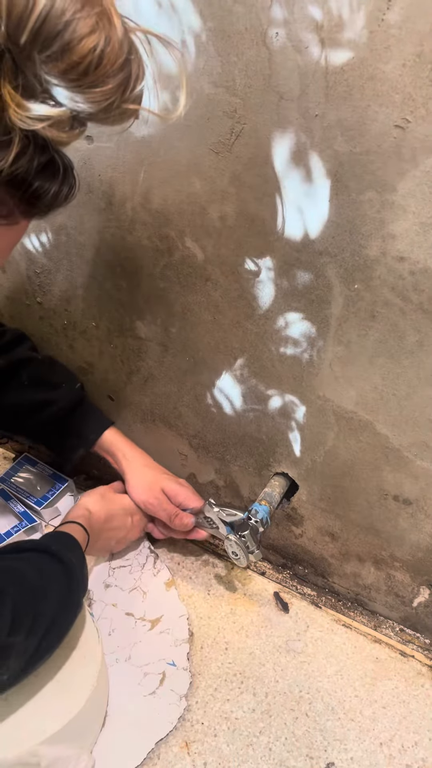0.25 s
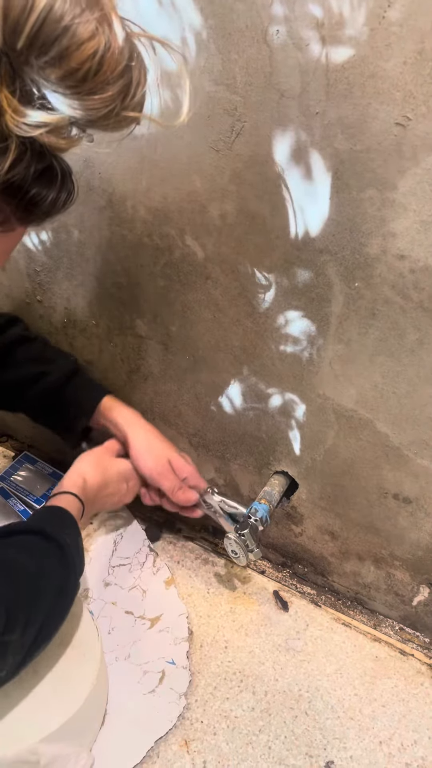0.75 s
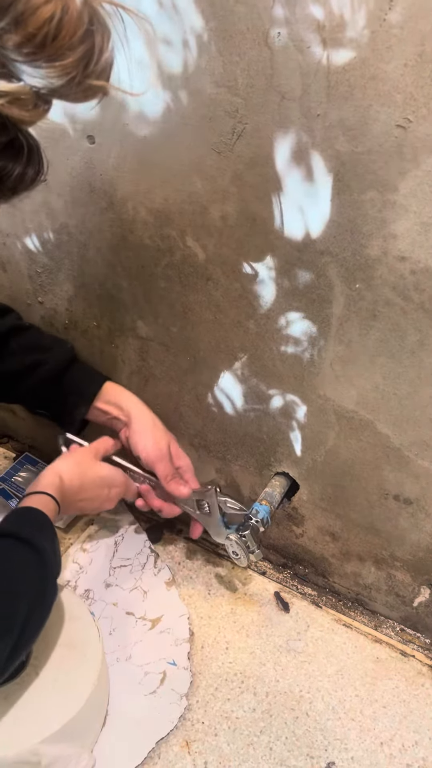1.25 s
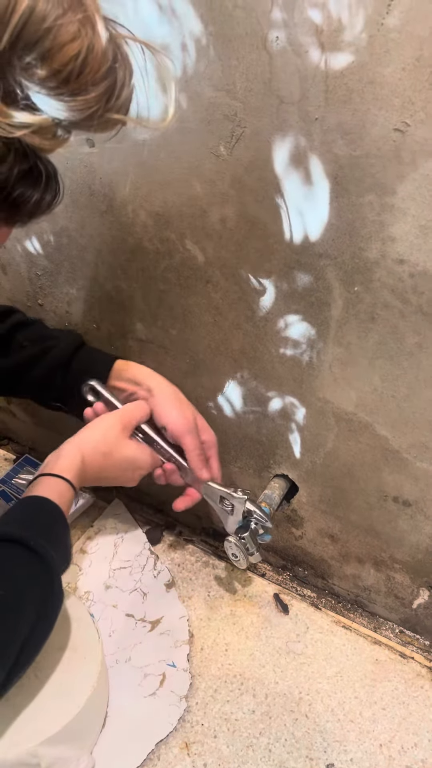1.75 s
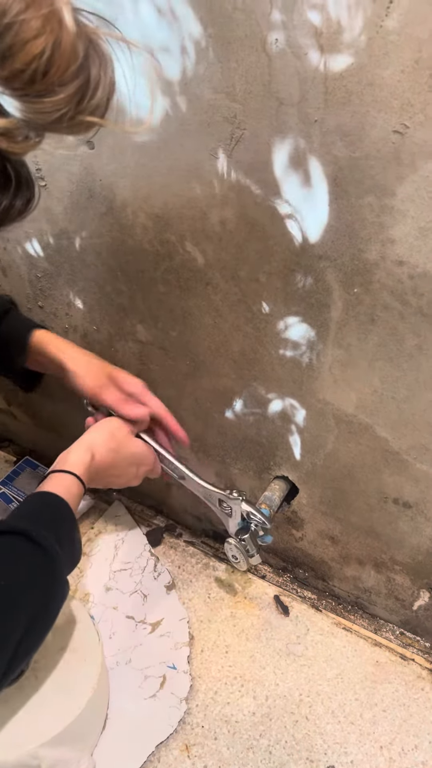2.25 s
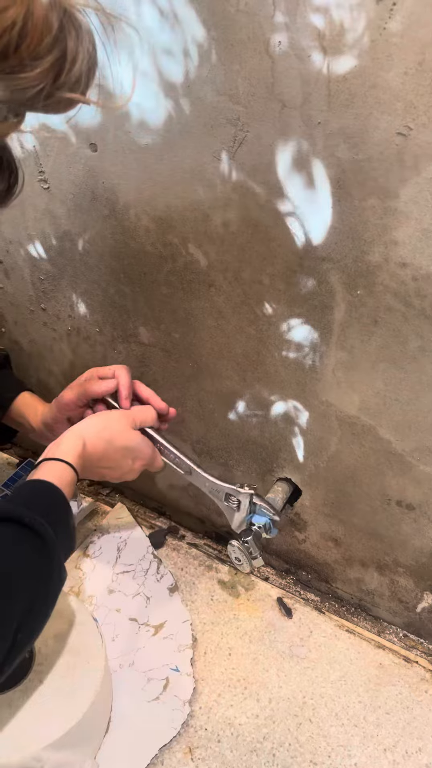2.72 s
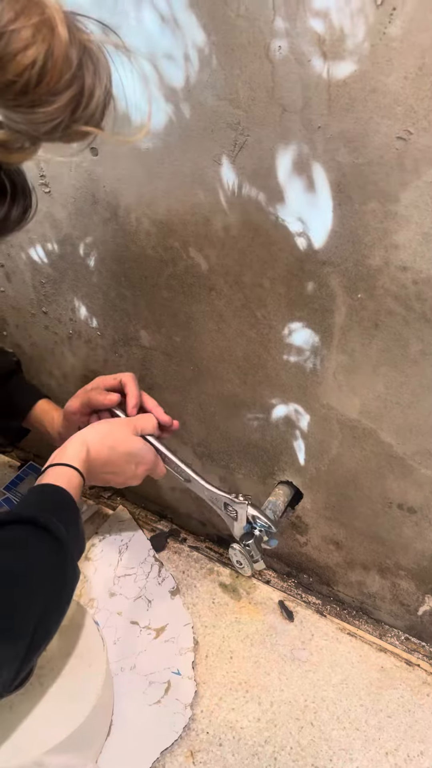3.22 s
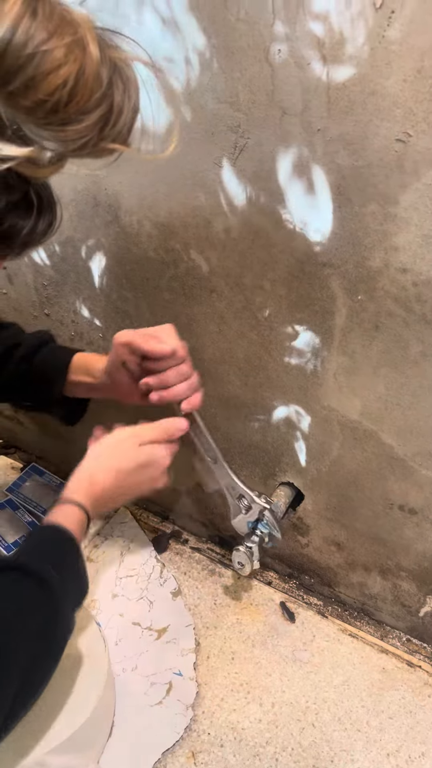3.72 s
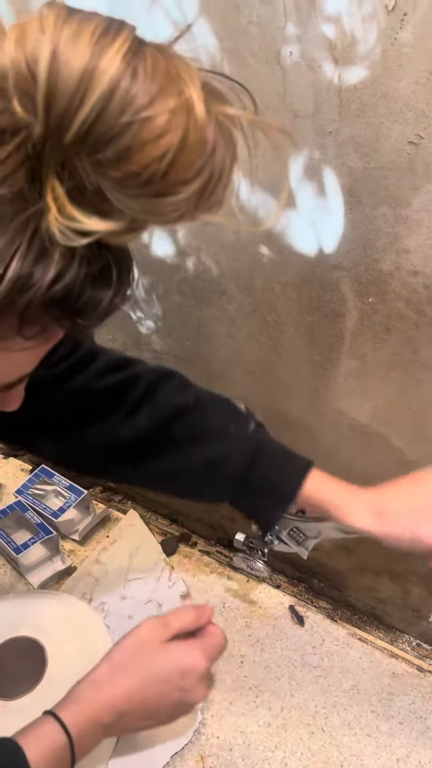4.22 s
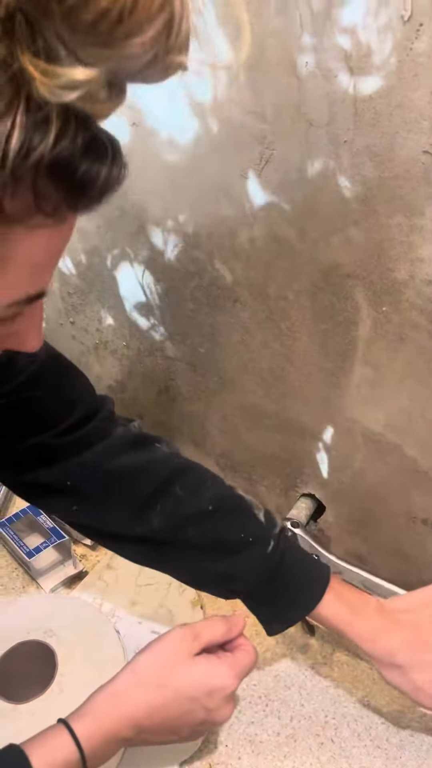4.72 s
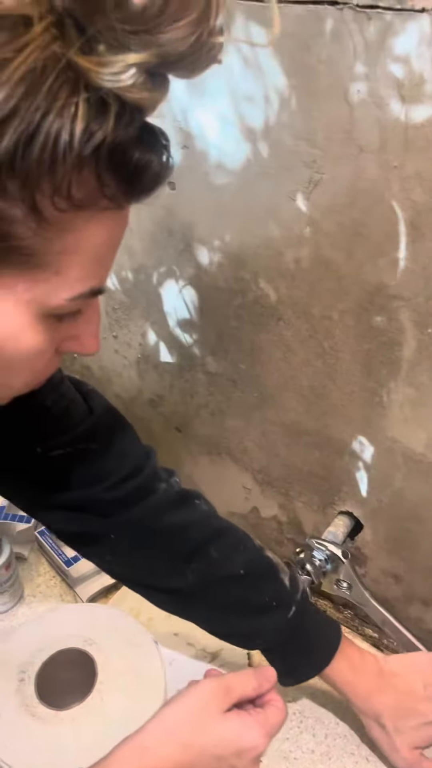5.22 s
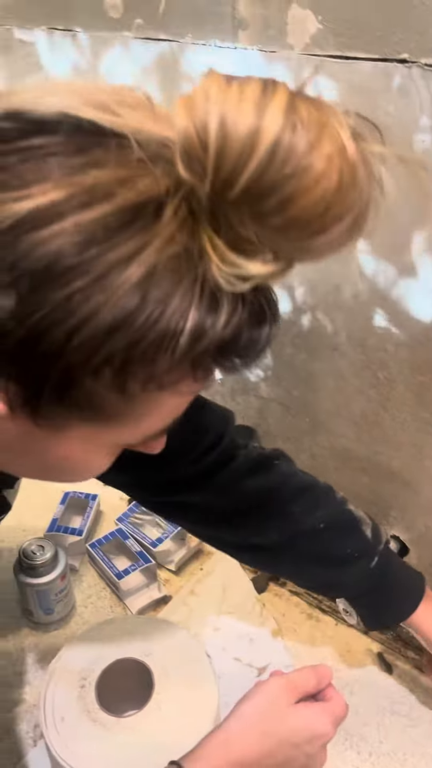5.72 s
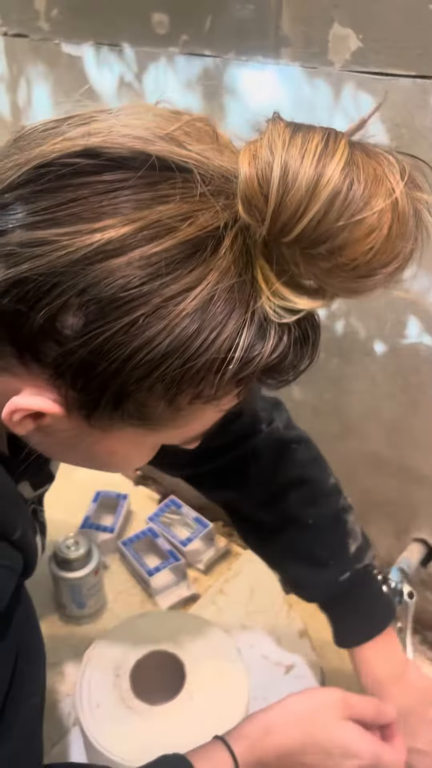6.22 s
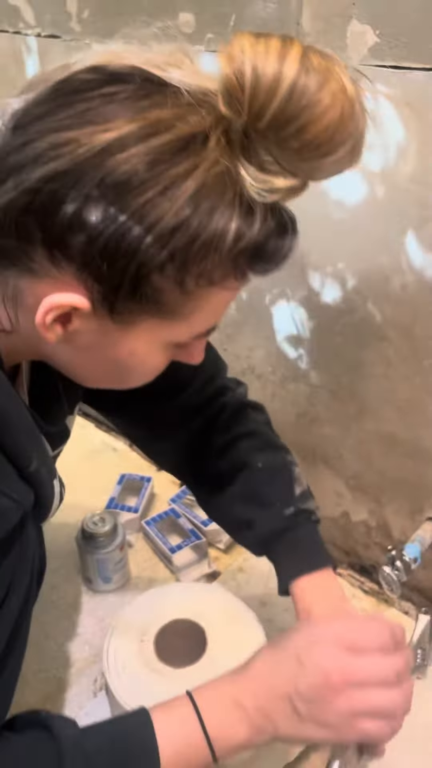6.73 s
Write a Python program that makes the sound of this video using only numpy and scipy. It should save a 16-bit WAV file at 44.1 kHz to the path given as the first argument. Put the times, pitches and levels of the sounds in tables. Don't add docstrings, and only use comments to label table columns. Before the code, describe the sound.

Close stereo sound of handiwork on a wall pipe: early knock and faint squeak, jaws clicking and grinding, low booms as the hand leans on the tool. The loudest ringing steel clinks come around two and a half seconds. After a sparse stretch of faint ticks comes a heavy knock, then a sharp multi-bounce metal clatter. A fan drones underneath, with short bright room echoes.

```python
import sys
import numpy as np
from scipy import signal
from scipy.fft import rfft, irfft
from scipy.io import wavfile

SR = 44100
rng = np.random.default_rng(int(sys.argv[2]) if len(sys.argv) > 2 else 0)


def convert_level_to_amplitude(level_db):
    exponent = np.asarray(level_db, float) / 20
    return 10 ** exponent


def wrap_up_sound(samples):
    columns = np.atleast_2d(samples).T
    tamed = np.clip(columns, -1, 1)
    steps = np.round(tamed * 32767).astype(np.int16)
    wavfile.write(sys.argv[1], SR, steps)


N = 306936
T = np.arange(N) / SR
HZ = np.fft.rfftfreq(N, 1 / SR)

# [f/Hz, level per Hz/dB]
FAN_SPECTRUM = [(15, -60), (25, -24.5), (65, 13), (115, -8.5), (174, -17.5), (249, -4.5), (429, -28),
                (488, -10.5), (569, -21), (1300, -29.5), (1480, -37.5), (1730, -29), (12000, -54.5),
                (15600, -99), (22000, -120)]
# [f/Hz, width/Hz, lift/dB]
DUCT_PEAKS = [(115, 20, -0.5), (243.5, 130, 12.5), (442, 200, 13.5), (1368, 160, 19.5), (1746, 240, 8)]

# [t of full speed/s, hold/s, bright rub level/dB, dull grind above it/dB]
SLIDES = [(0, 0.0092, -79, 3.5), (.19, 0.0039, -70, -1.5), (.81, 0.051, -75, 4.5), (1.2, 0.17, -82, 5),
          (1.75, 0.15, -77, 4.5), (2.02, 0.076, -77, -0.5), (2.15, 0.14, -77, -2), (2.56, 0.14, -65.5, 4.5),
          (2.8, 0.064, -85, 3.5), (3.08, 0.039, -91, -12), (3.27, 0.068, -85, -15.5),
          (3.54, 0.033, -85, -11), (3.63, 0.0093, -70, -10.5), (3.78, 0.16, -77, 1), (3.98, 0.23, -81, 0),
          (4.47, 0.006, -70, -7), (4.93, 0.016, -84, -17.5), (5.38, 0.014, -82, -17),
          (5.92, 0.013, -77.5, -1), (6.18, 0.037, -70.5, -1), (6.36, 0.41, -81, 5),
          (6.85, 0.027, -82.5, -20.5)]
SCRAPES = [
    (1.625, 0.017, -73, 8),
    (1.655, 0.0093, -60, 1),
    (2.33, .04, -64, -5),
    (2.385, 0.081, -55, 2.5),
]
# [f/Hz, level per Hz/dB]
RUB_SPECTRUM = [(2000, -23.5), (3000, -8), (4500, 0.5), (6500, 5), (8500, 0), (10500, -21.5), (13000, -37)]
# [f/Hz, level per Hz/dB]
GRIND_SPECTRUM = [(400, 0), (800, -3), (1500, -6), (3000, -4.5), (4500, -11), (7000, -36)]

# [t of full strain/s, hold/s, rumble level/dB, upper modes above it/dB]
PUSHES = [(.66, .01, -46.5, 0), (.91, 0.039, -38.5, -1.5), (1.31, 0.017, -27, -8), (1.76, 0.038, -24, -1.5),
          (1.88, 0.019, -30.5, -21), (2.34, 0.03, -28.5, -19), (2.47, 0.013, -22, 3),
          (2.6, 0.075, -25.5, 2), (2.72, 0.018, -25.5, -11.5), (2.91, 0.003, -30.5, -12),
          (3.1, 0.067, -32.5, -14.5), (3.22, 0.021, -36, -26.5), (3.43, 0.069, -37.5, -20),
          (3.95, 0.085, -41.5, -21.5), (4.12, 0.028, -50.5, -15.5), (5.27, 0.021, -38.5, -10.5),
          (6.03, 0.029, -36, -19), (6.14, 0.12, -27.5, -5), (6.62, 0.022, -42, 2.5)]
JERKS = [
    (.44, 0.24, -46.5, 2),
    (1.1, 0.0047, -35.5, -3),
    (1.2, 0.0073, -45, 0),
    (1.64, 0.072, -29, -1.5),
    (3.86, 0.015, -37.5, -13.5),
    (5.12, 0.067, -21.5, -5),
    (5.93, 0.042, -26.5, -12),
    (6.39, 0.07, -32.5, 6),
]
# [t/s, peak level/dB]
THUDS = [(0.491, -26), (1.262, -24.5), (1.734, -14.5), (1.757, -10), (2.412, -16.5), (2.597, -17),
         (3.112, -25.5), (3.852, -45), (5.106, -10.5), (5.921, -32), (6.38, -19.5)]
# [f/Hz, level/dB, t60/s]
WALL_MODES = [(50.15, -19, 0.34), (76.6, -1.5, 0.48), (120.64, -0.5, 0.31), (141.15, -4.5, 0.54),
              (171.3, -12, 0.27), (201.46, -2.5, 0.19), (238, -2.5, 0.3), (268, -6, 0.053),
              (304, -7.5, 0.23), (400, -12, 0.035), (477, -11.5, 0.21), (533.5, -20, 0.13),
              (673, -27.5, 0.28)]

# [t/s, peak level 5-9 kHz/dB, then relative to it: 0.4-2 kHz/dB, 2-5 kHz/dB, 9-12 kHz/dB]
KNOCKS = [(0.45, -19, 1, -3, -35), (0.4915, -27.5, -10, -17, -34), (1.7203, -40.5, -7, -7, -38),
          (1.6232, -50, 2, -6, -30), (1.64, -48, -6, -5, -31), (2.3143, -51, -4, -13, -33),
          (2.4441, -23.5, -1, -5, -30), (2.617, -32, -18.5, -17, -22), (2.632, -25, -10, -10, -20),
          (0.4851, -35, -5, -4, -33), (0.5055, -45.5, 3, 11, -35), (6.661, -64, -6, 2, -30),
          (2.3796, -30.5, -7, -16, -28), (2.5143, -25.5, -16, -19, -35.5), (2.5954, -23, 4.5, 6.5, -22.5),
          (5.1029, -21.5, -5, -14.5, -40.5), (6.4514, -30, -11, -14, -48), (6.4806, -28, 1, -1, -43),
          (6.5354, -37.5, 0, 8, -26.5), (6.5834, -35, -10, -6, -27), (6.6824, -47, -4, -1, -58)]
SNAPS = [
    (0.93, -36, -17, -5, -32),
    (3.1285, -47.5, -10, -12, -4),
    (3.3428, -41, -24, 5, -25),
    (6.8475, -42, -16, -4, -25),
    (.45, -23, -1.5, 4.5, -22),
    (1.7288, -19, 1, -1, -23),
    (5.1012, -26.5, 4, -2, -29),
    (2.4172, -19.5, -7.5, -9, -9.5),
    (6.4812, -30, 2.5, 8, -25),
]
# [t/s, peak level 5-9 kHz/dB, dullness (lift of 0.4-2 kHz)/dB]
TICKS = [(0.4816, -33, 2), (0.9073, -53, 4.5), (1.095, -52, 1), (1.651, -45, 6.5), (1.9086, -51, -2),
         (2.0038, -46.5, -18), (2.3306, -40.5, -10.5), (3.0594, -59, -10), (3.109, -58.5, -9),
         (3.25, -51.5, -11), (3.286, -47, -21), (3.3901, -51, -1), (4.9202, -71.5, -11), (5.368, -45, -26),
         (6.0162, -52.5, 0.5), (6.156, -52, -2.5), (6.1786, -43.5, 4.5), (6.2347, -44, -16),
         (6.82, -50.5, -14)]
# [t/s, peak level/dB, f/Hz]
PINGS = [(0.453, -28, 1110), (1.174, -51, 3100), (1.549, -56.5, 3640), (2.418, -9, 7510),
         (2.515, -22.5, 7280), (2.555, -19, 7500), (2.574, -32.5, 1910), (2.603, -5.5, 7115),
         (3.285, -47, 7070), (5.101, -26.5, 1710), (5.104, -12, 400), (6.381, -9.5, 4290),
         (6.484, -20.5, 2930), (6.585, -24.5, 6600), (6.611, -35, 1543), (6.681, -46, 7580),
         (6.819, -46.5, 7480), (6.82, -38.5, 4950), (6.847, -49.5, 2630)]
# [t/s, f/Hz, t60/s]
NOTES = [(0.4505, 930, .025), (0.451, 4150, .012), (0.451, 2900, .012), (1.035, 7800, .01),
         (1.037, 5400, .06), (1.645, 490, .2), (1.651, 12700, .06), (1.68, 490, .15), (1.73, 1500, .02),
         (1.765, 490, .15), (1.775, 690, .1), (2.42, 974, .12), (2.422, 1308, .12), (2.431, 7000, .03),
         (2.573, 6680, .04), (2.573, 10500, .05), (2.574, 8200, .03), (2.604, 10400, .04),
         (5.1015, 2550, .01), (5.1025, 2050, .01), (5.1045, 320, .1), (6.182, 1200, .04),
         (6.182, 3400, .06), (6.198, 3050, .06), (6.203, 1180, .04), (6.224, 1000, .03),
         (6.382, 13400, .08), (6.385, 480, .2), (6.392, 1787, .066), (6.392, 3914, .08), (6.481, 6630, .12),
         (6.482, 1500, .03), (6.578, 6590, .1)]
NOTE_LEVELS = [-28, -21, -30, -39.5, -52, -38, -46, -30.5, -46, -21.5, -25, -37, -36.5, -30, -28.5, -28.5,
               -29.5, -24.5, -28, -21.5, -20.5, -41, -57.5, -55.5, -44, -43.5, -37, -33.5, -26.5, -31.5,
               -28.5, -30, -32.5]
# [t/s, f/Hz]
LUMPS = [(.49, 80), (1.29, 84), (1.752, 82), (1.757, 136), (2.31, 240), (2.6, 479), (3.86, 68),
         (6.385, 378), (6.385, 135), (6.41, 497), (.4515, 790), (5.103, 520), (5.125, 215), (6.385, 1110)]
# [peak level/dB, t60/s]
LUMP_RINGS = [(-30.5, 0.21), (-28, 0.23), (-18.5, 0.34), (-32, 0.18), (-35.5, .1), (-34, .2), (-33, 0.32),
              (-30, 0.27), (-31, 0.24), (-42, 0.19), (-24.5, 0.035), (-31, 0.044), (-36, .2), (-33, 0.23)]
BAND_TOPS_HZ = [2000, 5000, 9000]
# [t/s, length/s, level/dB, f/Hz]
SQUEAKS = [
    (0.768, 0.12, -71, 5270),
    (0.828, 0.043, -67, 3160),
]

JAW_TICK = [
    (1.256, -26, -16.5, -6.5, -13.5),
]
# [f/Hz, level/dB, t60/s]
JAW_MODES = [(6650, -12, 0.09), (10440, 6, 0.084), (9900, -6, 0.06)]
VALVE_KNOCK = [
    (1.729, -25, -4, -4, -22),
    (1.731, -23, -4, -3, -24),
    (1.745, -32, -8, -8, -24),
]
# [f/Hz, level/dB, t60/s]
VALVE_MODES = [(3367, -12, 0.28), (3428, -4, .33), (5600, -8, .2), (7500, -11, 0.1), (8140, -12, .1),
               (12800, 0, .05), (13300, 4, .05)]
CONTACTS = [
    (2.4045, -25.5, -9.5, -6.5, -29.5),
    (2.4171, -19.5, -8.5, -3, -14),
    (2.4311, -26.5, -7.5, -14.5, -43),
    (2.555, -20, -35.5, -18, -24.5),
    (2.572, -25, -16, -5.5, -19.5),
    (2.5998, -8.5, -31, -22.5, -14),
    (2.6044, -20, -19.5, -19.5, -23),
]
GRIPPED_HZ = [974, 3305, 3461, 4899, 5120, 6137, 6614, 6747, 7083, 7277, 7383, 7446, 7865, 8173, 9895,
              10340, 10500, 11990, 13110, 13950]
# [level/dB, t60/s]
GRIPPED_RINGS = [(8, .27), (-13, .2), (-24, .3), (2, .15), (-22, .2), (-21, .15), (-2, .23), (-19, .13),
                 (-6, .22), (-2, .16), (-7, .12), (-11, .14), (-14, .09), (-4, .11), (-14, .15), (-9, .11),
                 (-4, .09), (-12, .1), (-3, .16), (-18, .05)]
DROP = [
    (6.3775, -9, -12.5, -17, -8),
    (6.381, -14, -18, -10.5, -1.5),
    (6.3848, -7, -27.5, -14.5, -25.5),
    (6.3912, -9.5, -18, -9, -18.5),
    (6.4063, -33, -23, -6, -33),
    (6.4204, -18, -29.5, -16, -17.5),
    (6.482, -28, -28, -14.5, -16),
    (6.5834, -39.5, -4.5, -25, -19),
]
FREE_HZ = [1110, 1615, 2580, 3171, 3723, 4237, 5259, 5798, 6550, 6587, 6634, 6680, 6763, 7193, 7322, 8296,
           10080, 10300, 11780, 12000, 12800, 14600]
# [level/dB, t60/s]
FREE_RINGS = [(-6, .2), (-12, .25), (13, .36), (-5, .22), (-12, .18), (-10, .14), (-21, .18), (-1, .25),
              (-8, .2), (-11, .17), (4, .3), (-12, .2), (-3, .3), (-7, .33), (-17, .15), (0, .25), (9, .08),
              (6, .07), (-7, .08), (-1, .08), (-12, .07), (1, .12)]
# [f/Hz, width/Hz, gain/dB]
VALLEYS = [(790, 420, -8.5), (2435, 330, -9.5), (5780, 1400, -7.5), (11260, 560, -17), (9340, 230, 3.5)]

# [t of full load/s, hold/s, level/dB]
CRUNCHES = [
    (1.66, 0.044, -46),
    (1.775, 0.048, -42.5),
    (2.4, 0.029, -45.5),
    (2.619, 0.046, -48),
    (6.203, 0.033, -48),
    (6.4, 0.02, -51.5),
]
# [t/s, level/dB]
PIPE_NOTE = [
    (1.88, -74),
    (1.93, -56),
    (2.25, -71),
    (2.36, -88),
]

# [f/Hz, t60/s]
ROOM_DECAY = [(300, 0.083), (1000, 0.35), (3000, 0.23), (7000, 0.27), (12000, 0.11)]
# [f/Hz, left leads by/rad]
PORT_PHASE = [(0, 0), (1800, .05), (3000, .9), (3800, .65), (4480, 1.8), (4850, 3.14), (5550, 6.0),
              (6100, 6.35), (8950, 9.42), (9400, 10.1), (10700, 11), (11400, 11.3), (11900, 12.5),
              (13700, 12.5), (14800, 15.6), (22050, 15.7)]
# [f/Hz, left minus right level/dB]
PORT_BALANCE = [(60, -.5), (170, -1.1), (520, -3), (900, -1.7), (1400, 0), (22050, 0)]
# [f/Hz, level/dB]
PORT_APART = [(60, -28), (250, -15), (520, -8), (900, -3), (1400, -6), (1800, -14), (2700, -4), (4200, -9),
              (4850, -15), (5300, -9), (5850, -28), (7200, -11), (8900, -16), (11000, -8), (12200, -3)]


def rms_one(x):
    return x / np.sqrt(np.mean(x ** 2) + 1e-20)


def at_hz(points, hz):
    p = np.array(points, float)
    return np.interp(np.log(hz + 1), np.log(p[:, 0] + 1), p[:, 1])


def band(x, low_hz, high_hz, order=2):
    return signal.sosfilt(signal.butter(order, [low_hz, high_hz], "band", fs=SR, output="sos"), x)


def low_pass(x, top_hz, order):
    return signal.sosfilt(signal.butter(order, top_hz, fs=SR, output="sos"), x)


def ring(drive, hz, t60):
    r = convert_level_to_amplitude(-60 / (t60 * SR))
    w = 2 * np.pi * hz / SR
    return signal.lfilter([0, np.sin(w)], [1, -2 * r * np.cos(w), r * r], drive + 1e-18)


def flicker(rate_hz):
    return np.interp(T * rate_hz, np.arange(400), rng.standard_normal(400))


def coloured(gain_db):
    return rms_one(irfft(rfft(rng.standard_normal(N)) * convert_level_to_amplitude(gain_db), N))


def resonances_db(rows):
    return sum(db / (1 + (2 * (HZ - hz) / width) ** 2) for hz, width, db in rows)


def strokes(rows, rise_db_per_s, fall_db_per_s):
    s, hold_s, db, second_db = np.transpose(rows)[:, :, None]
    t = T[::32]
    before, after = np.maximum(s - t, 0), np.maximum(t - s - np.abs(hold_s), 0)
    shape_db = db - rise_db_per_s * before - fall_db_per_s * after
    power = [np.sum(convert_level_to_amplitude(2 * (shape_db + lift)), axis=0) for lift in (0, second_db)]
    return np.array([np.interp(T, t, p) for p in power])


def layer_levels(power, rest_db, second_rest_db):
    first_db, second_db = 10 * np.log10(power + convert_level_to_amplitude(2 * np.array([[rest_db], [second_rest_db]])))
    return first_db, second_db - first_db


def fan():
    return convert_level_to_amplitude(-47 - 2) * coloured(at_hz(FAN_SPECTRUM, HZ) + resonances_db(DUCT_PEAKS))


def sliding():
    power = strokes(SLIDES, rise_db_per_s=201, fall_db_per_s=175.5)
    power = power + strokes(SCRAPES, rise_db_per_s=1200, fall_db_per_s=175.5)
    return layer_levels(power, -90, -84)


def rubbing(rub_db, grind_db):
    both = coloured(at_hz(RUB_SPECTRUM, HZ)) + convert_level_to_amplitude(grind_db) * coloured(at_hz(GRIND_SPECTRUM, HZ))
    return convert_level_to_amplitude(rub_db + 6 + 1.6 * flicker(57)) * both


def strain():
    power = strokes(PUSHES, rise_db_per_s=166.5, fall_db_per_s=145.5)
    power = power + strokes(JERKS, rise_db_per_s=609.5, fall_db_per_s=214)
    return layer_levels(power, -48, -55.5)


def wall(rumble_db, upper_db):
    rows = np.array(THUDS)
    at = (rows[:, 0] * SR).astype(int)
    luck = rng.standard_normal((len(rows), len(WALL_MODES)))
    struck, low, upper = np.zeros((3, N))
    for k, (hz, level_db, t60) in enumerate(WALL_MODES):
        clicks = np.zeros(N)
        strength = convert_level_to_amplitude(rows[:, 1] + level_db - 15 + 3.7 * luck[:, k])
        clicks[at] = strength * np.sign(luck[:, k - 1])
        struck += ring(clicks, hz, t60)
        lumpy = rng.standard_normal(N) * convert_level_to_amplitude(2.7 * flicker(25))
        shaken = convert_level_to_amplitude(level_db) * rms_one(ring(lumpy, hz, t60 * 0.65))
        if hz < 200:
            low += shaken
        else:
            upper += shaken
    return struck + convert_level_to_amplitude(rumble_db - 5) * (rms_one(low) + convert_level_to_amplitude(upper_db) * rms_one(upper))


def level_at(rows, hz):
    band_db = rows[:, [1]] + rows[:, [2, 3, 1, 4]] * [1, 1, 0, 1]
    return band_db[np.arange(len(rows)), np.searchsorted(BAND_TOPS_HZ, hz)]


def cracks(rows, crack_s, patchy_db, shoulder_db, top_hz):
    at = (rows[:, 0] * SR).astype(int)
    edges = 400 * 2 ** np.arange(0, 5.1, .5)
    luck = rng.standard_normal((len(rows), len(edges)))
    noise, out = rng.standard_normal(N), np.zeros((2, N))
    for k, (low, high) in enumerate(zip(edges, edges[1:])):
        shoulder = shoulder_db * (3100 < low < 6000)
        clicks = np.zeros(N)
        clicks[at] = convert_level_to_amplitude(level_at(rows, low * 1.2) + patchy_db * luck[:, k] + shoulder)
        burst = noise * signal.lfilter([1], [1, -np.exp(-1 / (crack_s * SR))], clicks + 1e-18)
        snap = clicks * np.sqrt(crack_s * SR / 2)
        both = band([burst + .45 * snap, snap], low, high)
        both = both * (-1) ** k
        out += convert_level_to_amplitude(-7) * both * np.sqrt(SR / 4 / (high - low))
    return low_pass(out, top_hz, order=4)


def knocks():
    ticks = [(s, db, dull, -12 + 0.46 * dull, -34.5) for s, db, dull in TICKS]
    dull_rows = np.array(list(KNOCKS) + ticks)
    out = cracks(dull_rows, crack_s=0.0016, patchy_db=1.76, shoulder_db=-1.5, top_hz=9000)
    out = out + cracks(np.array(SNAPS), crack_s=0.0003, patchy_db=5, shoulder_db=0, top_hz=9000)
    out = out * convert_level_to_amplitude(np.array([[0], [-2.5]]))
    notes = [(s, db, hz, .018) for s, db, hz in PINGS]
    notes += [(s, db, hz, t60) for (s, hz, t60), db in zip(NOTES, NOTE_LEVELS)]
    notes += [(s, db, hz, t60) for (s, hz), (db, t60) in zip(LUMPS, LUMP_RINGS)]
    t = T[:SR // 3]
    for s, db, hz, t60 in notes:
        start = int(s * SR)
        envelope = convert_level_to_amplitude(db - 60 * t / t60) * (1 - np.exp(-t / .0003))
        note = envelope * np.sin(2 * np.pi * hz * t) * [[1], [.4]]
        out[:, start:start + len(t)] += note[:, :N - start]
    return out


def squeaks():
    noise, out = rng.standard_normal(N), np.zeros(N)
    for s, length_s, db, hz in SQUEAKS:
        swell = np.sin(np.pi * np.clip((T - s) / length_s, 0, 1))
        out += convert_level_to_amplitude(db) * rms_one(ring(noise, hz, .02)) * swell
    return out


def steel(events, modes, crack_s, ring_db, spread_db, crack_db, shoulder_db):
    rows = np.array(events)
    luck = rng.standard_normal((len(rows), len(modes)))
    out = convert_level_to_amplitude(crack_db) * cracks(rows, crack_s, 1.8, shoulder_db, top_hz=10800)
    at = (rows[:, 0] * SR).astype(int)
    span = slice(at.min(), min(N, at.max() + int(.6 * SR)))
    for k, (hz, level_db, t60) in enumerate(modes):
        clicks = np.zeros(N)
        clicks[at] = convert_level_to_amplitude(level_at(rows, hz) + ring_db + level_db + spread_db * luck[:, k])
        soft = signal.lfilter(*signal.iirpeak(hz, hz / 2200, fs=SR), clicks[span] + 1e-18)
        rattle = convert_level_to_amplitude(3.5 * flicker(55)[span])
        out[:, span] += ring(soft, hz, np.clip(t60, .02, .5)) * rattle
    return out


def wrench_hits():
    gripped, free = np.c_[GRIPPED_HZ, GRIPPED_RINGS], np.c_[FREE_HZ, FREE_RINGS]
    hits = steel(JAW_TICK, JAW_MODES, crack_s=0.0037, ring_db=-1, spread_db=1, crack_db=0, shoulder_db=-1.5)
    hits += steel(VALVE_KNOCK, VALVE_MODES, crack_s=0.003, ring_db=-14, spread_db=1,
                  crack_db=-1.5, shoulder_db=-4)
    hits += steel(CONTACTS, gripped, crack_s=0.0051, ring_db=-11.5, spread_db=1, crack_db=-0.5, shoulder_db=-5)
    hits += steel(DROP, free, crack_s=0.006, ring_db=-17, spread_db=2.5, crack_db=-1.5, shoulder_db=-2.5)
    return hits


def valleys(x, share):
    return irfft(rfft(x) * convert_level_to_amplitude(share * resonances_db(VALLEYS)), N)


def grit():
    grains = rng.standard_normal(N) * (rng.random(N) < 550 / SR)
    load = strokes([(*row, 0) for row in CRUNCHES], rise_db_per_s=348.5, fall_db_per_s=198)[0]
    return np.sqrt(load) * rms_one(band(grains, 400, 687, order=4))


def pipe_note():
    s, db = np.transpose(PIPE_NOTE)
    return convert_level_to_amplitude(np.interp(T, s, db) + 1.2 * flicker(30)) * np.sin(2 * np.pi * 712 * T)


def bathroom(x):
    t = T[:SR // 2]
    edges = 200 * 2 ** np.arange(0, 6.6, .5)
    white, tail = rng.standard_normal((2, len(t))), np.zeros(len(t))
    for k, (low, high) in enumerate(zip(edges, edges[1:])):
        t60 = at_hz(ROOM_DECAY, np.sqrt(low * high))
        tail += band(white[k % 2], low, high) * convert_level_to_amplitude(-60 * t / t60)
    tail = low_pass(tail, 10200, order=6) * (1 - np.exp(-t / 0.0016))
    return signal.fftconvolve(x, tail / np.sqrt(np.sum(tail ** 2)))[:N]


def ports(alike, apart):
    turn = np.exp(.5j * np.interp(HZ, *np.transpose(PORT_PHASE)))
    half = convert_level_to_amplitude(at_hz(PORT_BALANCE, HZ) / 2) * turn
    heard = rfft(alike) + convert_level_to_amplitude(at_hz(PORT_APART, HZ)) * rfft(apart) * [[1], [-1]]
    return irfft(heard * np.array([half, 1 / half]), N)


def scene():
    direct, to_room = valleys(wrench_hits(), share=0.8) + valleys(knocks(), share=0.67)
    slide = sliding()
    alike, apart = (convert_level_to_amplitude(-3.5) * bathroom(to_room) + rubbing(*slide) + fan() for _ in range(2))
    booms = wall(*strain()) + pipe_note()
    return ports(direct + booms + alike + squeaks() + grit(), apart)


def band_limit(x):
    return signal.sosfilt(signal.butter(12, 16000, fs=SR, output="sos"), x)


def record(dry):
    dull = band(dry, 42, 13500, order=3)
    dull = low_pass(dull, 15600, order=8)
    return band_limit(np.tanh(dull))


dry = scene()
out = record(dry)
wrap_up_sound(out)
```